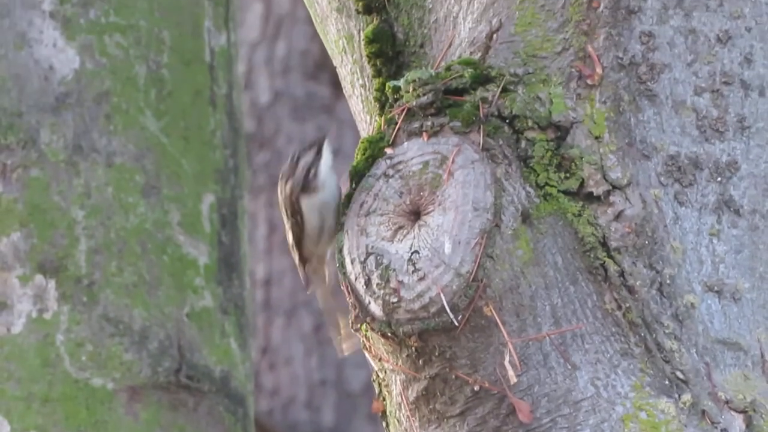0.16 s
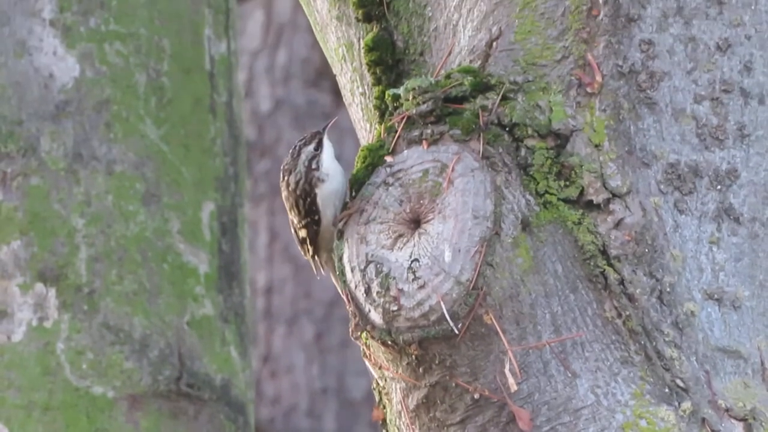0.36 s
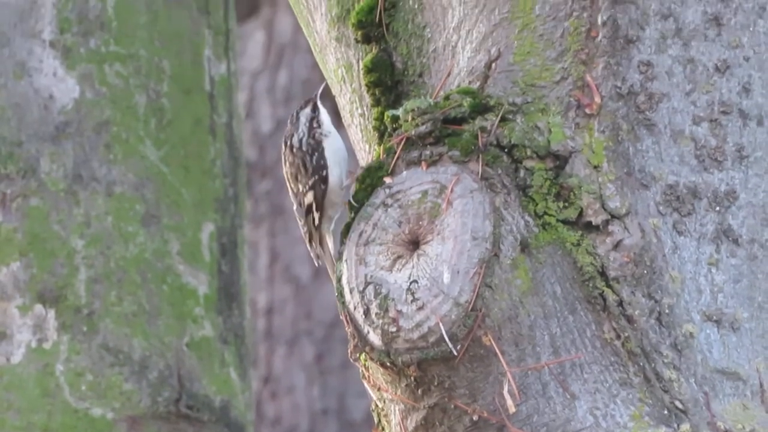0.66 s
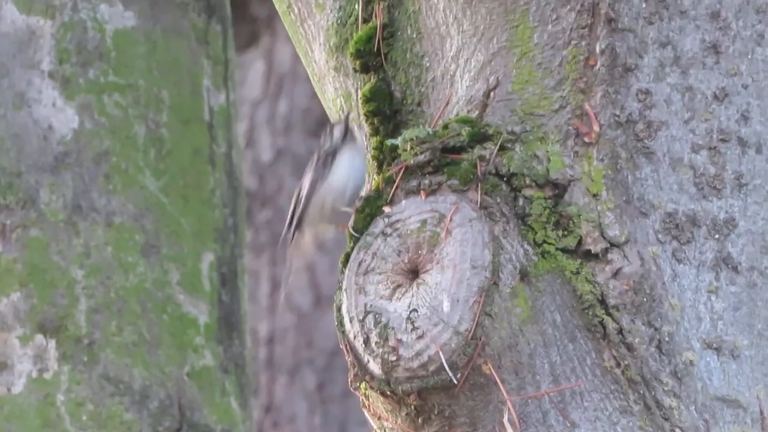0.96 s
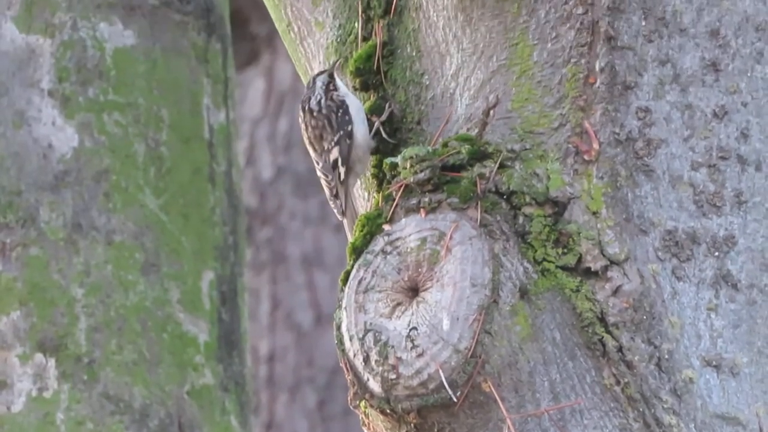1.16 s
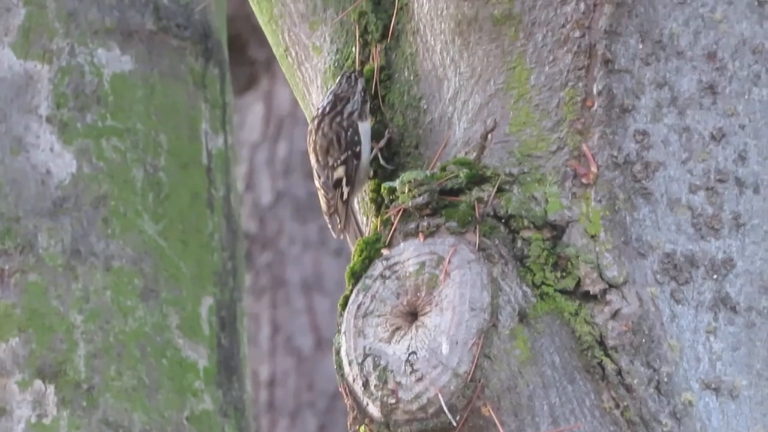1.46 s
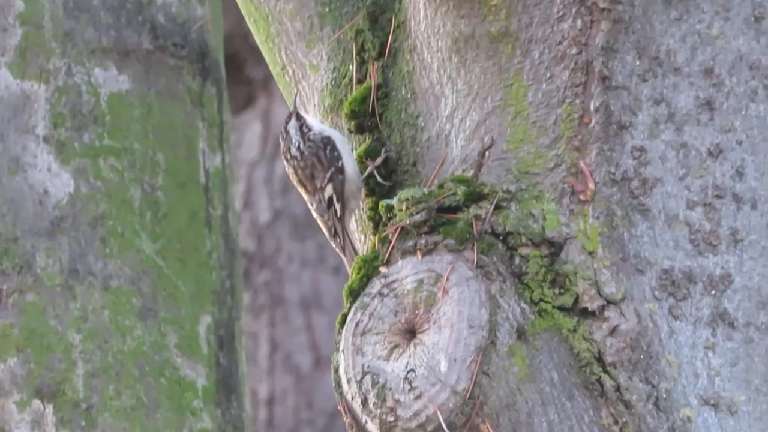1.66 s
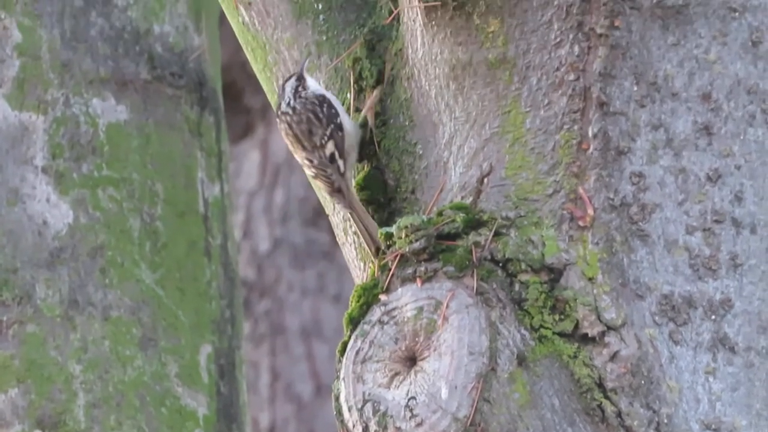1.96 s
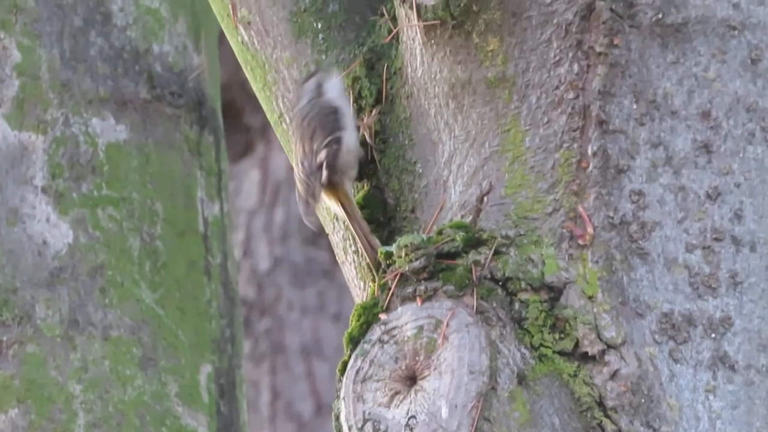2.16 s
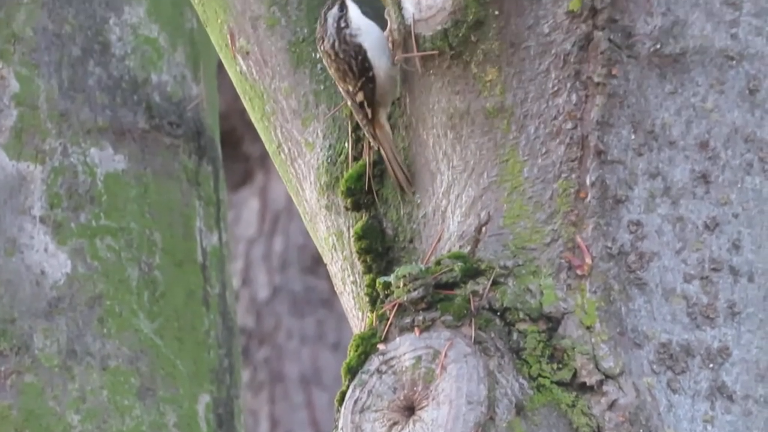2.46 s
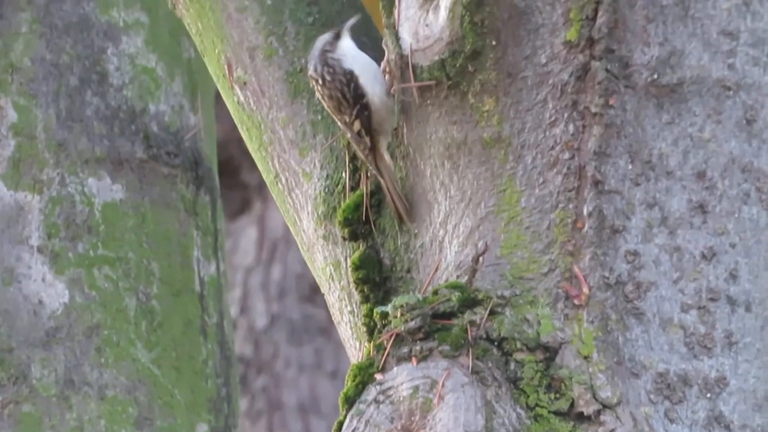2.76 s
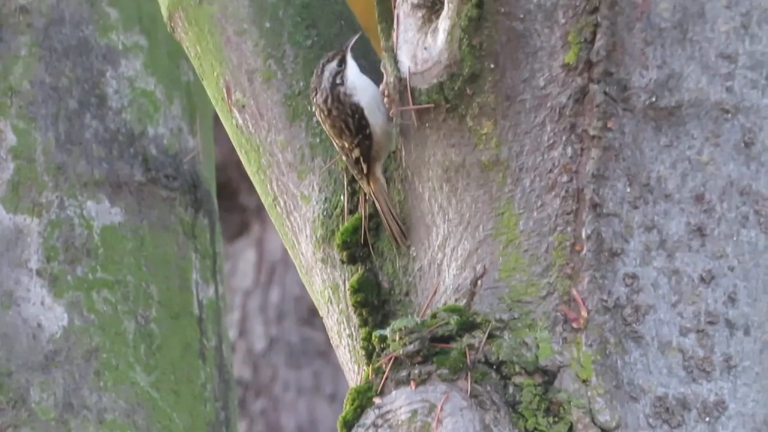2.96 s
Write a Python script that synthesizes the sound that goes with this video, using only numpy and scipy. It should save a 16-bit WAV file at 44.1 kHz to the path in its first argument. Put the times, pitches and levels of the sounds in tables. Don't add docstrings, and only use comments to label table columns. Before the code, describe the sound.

A treecreeper utters four tiny, very high whistles in the last third, after two seconds of only distant traffic wash and low engine hum; outdoors among trees, stereo camera microphone.

```python
import sys
import numpy as np
from scipy import signal
from scipy.fft import rfft, irfft
from scipy.io import wavfile
from scipy.ndimage import uniform_filter1d

SR = 44100
rng = np.random.default_rng(int(sys.argv[2]) if len(sys.argv) > 2 else 0)


def attenuation_scalar(level_db):
    decades = np.asarray(level_db, float) / 20
    return 10 ** decades


def master_out(mix):
    frames = np.transpose(np.atleast_2d(mix))
    ceiling = np.clip(frames, -1, 1)
    pcm = np.round(ceiling * 32767).astype(np.int16)
    wavfile.write(sys.argv[1], SR, pcm)


N = 137592

# frequency_hz, level_db (per Hz)
TRAFFIC_COLOUR = [(22, -6), (45, 3.5), (100, 3), (300, -5), (600, -10.5), (1050, -11.5), (2600, -22.5),
                  (3400, -33.5)]
# frequency_hz, level_db (per Hz)
AIR_COLOUR = [(1500, -27), (3400, -33), (5200, -38.5), (7000, -47), (10000, -53), (13000, -60.5),
              (15000, -62.5)]
# frequency_hz, level_db
STEREO_WIDTH = [(110, -74.5), (150, -47), (200, -46.5), (330, -22.5), (1000, -19), (2500, -10.5),
                (5500, -3.5), (12000, -1)]
# frequency_hz, level_db
STEREO_LEAN = [(400, 0.5), (600, 0.3), (1010, 1), (1770, 2.8), (3120, -0.5), (5480, 0.7), (9630, .05)]
# centre_hz, width_octaves, lift_db
TYRE_HUMPS = [(290, .35, 0.5), (882, 0.2, 3), (2570, 0.1, 0.5)]
# multiple (of the half-turn rate), level_db, wobble_db
HUM_LINES = [(2, -39, 2.8), (3, -33, 3), (4, -24.6, .7), (6, -47, 2.4), (8, -44.5, 3)]
# centre_s, dip_db, spread_s
IDLE_STUMBLES = [
    (.87, -7.5, 0.035),
    (1.15, -6, 0.02),
    (2.25, -3, 0.041),
]
# pitch_hz, level_db, loudest_s, spread_s
GEAR_WHINES = [
    (470, -39, 1.8, .22),
    (467, -45, 2.7, .12),
    (527.5, -49, 1.7, 1.6),
    (1135, -48, 1.5, 1.6),
]
# delay_s, level_db
BIG_TRUNK_ECHOES = [
    (.035, -16),
    (.069, -19),
]
# start_s, pitch_hz, level_db
WHISTLES = [
    [(2.007, 8380, -62), (2.012, 8600, -52), (2.021, 8440, -43.5), (2.028, 8230, -56), (2.038, 7850, -66)],
    [(2.297, 9000, -64), (2.304, 9120, -54), (2.318, 8640, -47), (2.33, 8350, -49), (2.342, 8150, -54),
     (2.358, 7910, -48), (2.39, 7920, -54), (2.418, 7740, -49), (2.448, 7670, -60)],
    [(2.614, 8330, -65), (2.624, 8700, -52), (2.64, 8220, -52), (2.654, 7830, -47), (2.68, 7700, -48),
     (2.73, 7735, -50), (2.772, 7795, -42), (2.8, 7905, -46), (2.814, 7900, -57)],
    [(2.888, 8520, -60), (2.898, 8680, -47), (2.914, 8100, -52), (2.932, 7880, -44.5), (2.954, 7840, -56),
     (2.966, 7843, -47), (2.998, 7815, -62), (3.011, 7840, -53), (3.022, 7830, -66)],
]

WASH_DB, FLICKER_DB, FLICKER_PER_S = -27, .5, 5.34
MONO_BELOW_HZ, AIR_TOP_HZ = 230, 14950
LORRY_DB, LORRY_FADE_S, LORRY_TOP_HZ = 2.5, 1.1, 280
HALF_TURN_HZ, ENGINE_DRIFT, WHINE_DRIFT = 20.32, .0008, .002
HUM_WOBBLE_PER_S, HUM_SLIP_RAD = 12, .17
TREES_DB, TREES_T60_S, TREES_START_S = -7.5, .23, .005
TRUNKS_PER_S, TREES_ALIKE = 500, .6
ECHO_TOP_HZ, BARK_SMEAR_S = 11000, .004
OCTAVE_DB, HALF_LINE_DB = -30, -36
NOTE_EDGE_S, GLIDE_S = .004, .008
FLUTTER_DB, FLUTTER_PER_S = 3, 130
WAVER_HZ, WAVER_PER_S = 10, 90
BIRD_DB, BIRD_PAN_DB, BIRD_LAG_RAD = 1, -1.5, 0.88
MASK_MARGIN_DB, MASK_DB_PER_KHZ = 14.8, 6.3
MASK_FROM_HZ, MASK_CAP_DB = 7300, -60
SPARED_BELOW_HZ, SPARED_DB = 9100, 7
FADE_IN_S, START_GAIN = .004, .35


def read(table, hz):
    table = np.array(table, float)
    return np.interp(np.log(hz + 1), np.log(table[:, 0] + 1), table[:, 1])


def walk(rate):
    step = np.minimum((np.arange(N) * rate / SR).astype(int), 511)
    held = rng.standard_normal(512)[step]
    slew = max(int(SR / rate), 1)
    return 1.3 * uniform_filter1d(uniform_filter1d(held, slew), slew)


def traffic():
    hz = np.fft.rfftfreq(N, 1 / SR)
    rolloff = np.minimum(1, (TRAFFIC_COLOUR[-1][0] / (hz + 1)) ** 8)
    wash = attenuation_scalar(read(TRAFFIC_COLOUR, hz)) ** 2 * rolloff
    colour = np.sqrt(wash + attenuation_scalar(read(AIR_COLOUR, hz)) ** 2)
    for centre, width, lift_db in TYRE_HUMPS:
        colour = colour * attenuation_scalar(lift_db * np.exp(-.5 * (np.log2((hz + 1) / centre) / width) ** 2))
    colour = colour / np.sqrt(1 + (hz / AIR_TOP_HZ) ** 200)

    mid, free = rfft(rng.standard_normal((2, N)), axis=1) * colour
    side = free * attenuation_scalar(read(STEREO_WIDTH, hz))
    lean = attenuation_scalar(read(STEREO_LEAN, hz) / 2 * (hz > MONO_BELOW_HZ))
    pair = np.array([(mid + side) * lean, (mid - side) / lean])

    lorry_db = LORRY_DB * np.exp(-(np.arange(N) / SR / LORRY_FADE_S) ** 2)
    place = 2 * np.log2((hz + 1) / 20)
    out = 0
    for k in range(20):
        share = np.cos(np.pi / 2 * np.clip(place - k, -1, 1)) ** 2
        low = 1 / (1 + (20 * 2 ** (k / 2) / LORRY_TOP_HZ) ** 2)
        level_db = low * lorry_db + FLICKER_DB * walk(FLICKER_PER_S)
        out = out + attenuation_scalar(level_db) * irfft(pair * share, N, axis=1)
    return out * attenuation_scalar(WASH_DB) / np.sqrt(np.mean(out ** 2))


def engine():
    t = np.arange(N) / SR
    phase = 2 * np.pi * np.cumsum(HALF_TURN_HZ * (1 + ENGINE_DRIFT * walk(1.66))) / SR
    out = 0
    for multiple, db, wobble_db in HUM_LINES:
        slip = HUM_SLIP_RAD * wobble_db * walk(HUM_WOBBLE_PER_S) + 2 * np.pi * rng.random()
        level = attenuation_scalar(db + wobble_db * walk(HUM_WOBBLE_PER_S))
        out = out + level * np.sin(round(multiple) * phase + slip)
    for hz, db, at, spread in GEAR_WHINES:
        swell = np.exp(-.5 * ((t - at) / spread) ** 2) * attenuation_scalar(1.2 * walk(4.82))
        whine_phase = 2 * np.pi * np.cumsum(hz * (1 + WHINE_DRIFT * walk(2.5))) / SR
        out = out + attenuation_scalar(db) * swell * np.sin(whine_phase)
    dips_db = sum(db * np.exp(-.5 * ((t - at) / spread) ** 2) for at, db, spread in IDLE_STUMBLES)
    return np.sqrt(2) * out * attenuation_scalar(dips_db)


def trees(song):
    t = np.arange(SR // 2) / SR
    draw, size = rng.random((3, len(t))), rng.standard_normal((3, len(t)))
    hit = (draw < TRUNKS_PER_S / SR) * (t > TREES_START_S)
    taps = hit * size * attenuation_scalar(-60 * t / TREES_T60_S)
    taps = taps / np.sqrt(np.sum(taps ** 2, axis=1, keepdims=True))
    pair = np.sqrt(TREES_ALIKE) * taps[0] + np.sqrt(1 - TREES_ALIKE) * taps[1:]
    burst = sum(attenuation_scalar(db) * np.exp(-((t - lag) / BARK_SMEAR_S) ** 2) for lag, db in BIG_TRUNK_ECHOES)
    slaps = burst * size[1:] / np.sqrt(BARK_SMEAR_S * SR)
    dull = signal.sosfilt(signal.butter(4, ECHO_TOP_HZ, fs=SR, output="sos"), song)
    return signal.fftconvolve(dull[None], attenuation_scalar(TREES_DB) * pair + slaps, axes=1)[:, :N]


def bird():
    t, out = np.arange(N) / SR, np.zeros(N, complex)
    waver, flutter = WAVER_HZ * walk(WAVER_PER_S), FLUTTER_DB * walk(FLUTTER_PER_S)
    for whistle in WHISTLES:
        s, hz, db = np.array(whistle, float).T
        pitch = uniform_filter1d(np.interp(t, s, hz), int(GLIDE_S * SR)) + waver
        phase = 2 * np.pi * np.cumsum(pitch) / SR
        gate = np.clip(np.minimum(t - s[0], s[-1] - t) / NOTE_EDGE_S, 0, 1)
        tone = np.exp(1j * phase)
        tone = tone + attenuation_scalar(OCTAVE_DB) * np.exp(2j * phase)
        tone = tone + attenuation_scalar(HALF_LINE_DB) * np.exp(3j * phase / 2)
        out += np.sqrt(2) * gate * attenuation_scalar(np.interp(t, s, db) + flutter) * tone
    return out


def scene():
    song = bird()
    halves = np.array([[.5], [-.5]])
    ears = attenuation_scalar(BIRD_DB + halves * BIRD_PAN_DB) * np.exp(1j * BIRD_LAG_RAD * halves)
    return (ears * song).real + trees(song.real) + engine() + traffic()


def drop_hidden_hiss(pair):
    mid_side = np.array([pair[0] + pair[1], pair[0] - pair[1]]) / 2
    hz, _, cells = signal.stft(mid_side, SR, nperseg=1024)
    hz = hz[:, None]
    power = uniform_filter1d(np.abs(cells) ** 2, size=8, axis=1)
    db = 10 * np.log10(uniform_filter1d(power, size=3, axis=2) + 1e-18)
    slope = MASK_DB_PER_KHZ * hz / 1000
    masker = np.minimum(uniform_filter1d(db[0], size=5, axis=1), MASK_CAP_DB) + slope
    masker = np.where(hz > MASK_FROM_HZ, masker, -300)
    reach = np.maximum.accumulate(masker, axis=0) - slope
    heard = db > reach - MASK_MARGIN_DB - SPARED_DB * (hz < SPARED_BELOW_HZ)
    mid, side = signal.istft(cells * heard, SR, nperseg=1024)[1][:, :N]
    return np.array([mid + side, mid - side])


def band_limit(x):
    return signal.sosfilt(signal.butter(12, 15700, fs=SR, output="sos"), x)


def record(dry):
    fade = np.minimum(START_GAIN + np.arange(N) / (FADE_IN_S * SR), 1)
    mix = drop_hidden_hiss(dry * fade)
    return band_limit(mix)


dry = scene()
out = record(dry)
master_out(out)
```